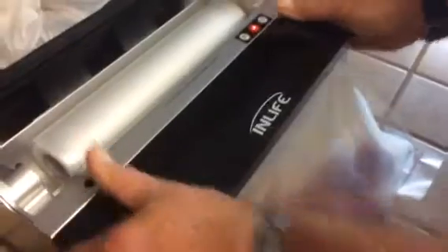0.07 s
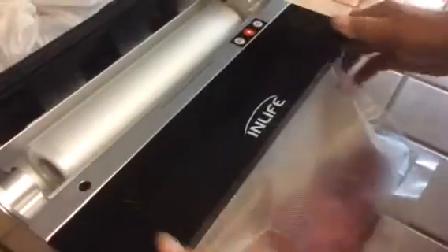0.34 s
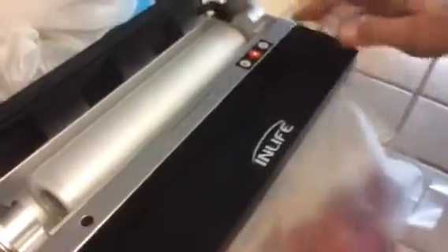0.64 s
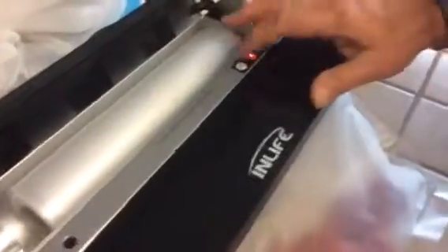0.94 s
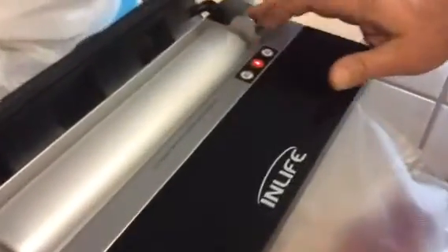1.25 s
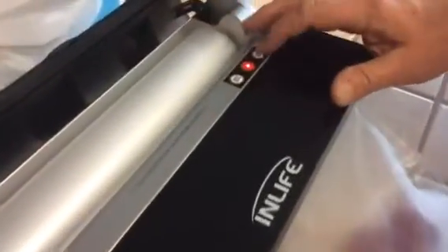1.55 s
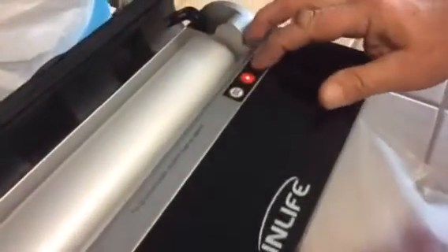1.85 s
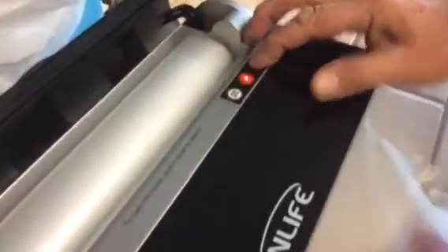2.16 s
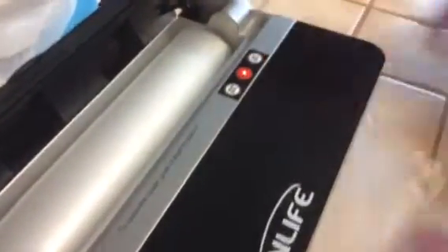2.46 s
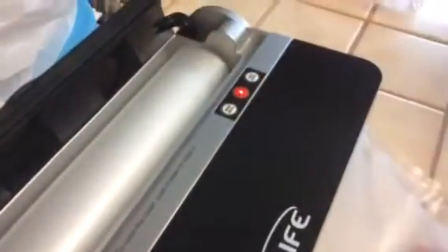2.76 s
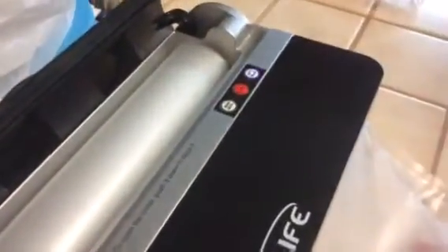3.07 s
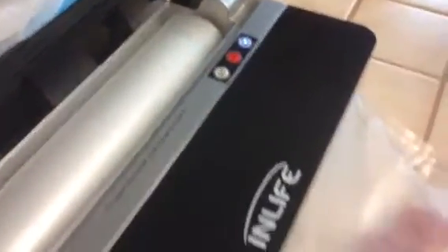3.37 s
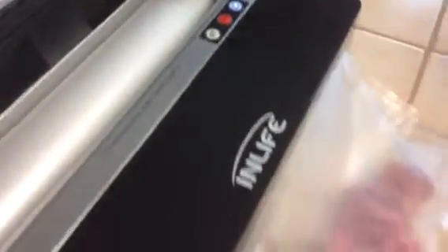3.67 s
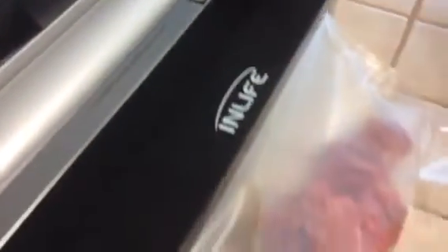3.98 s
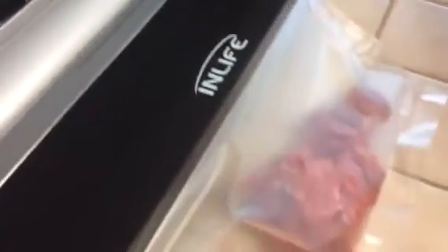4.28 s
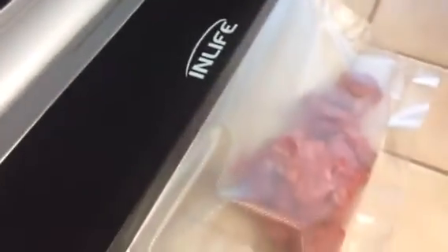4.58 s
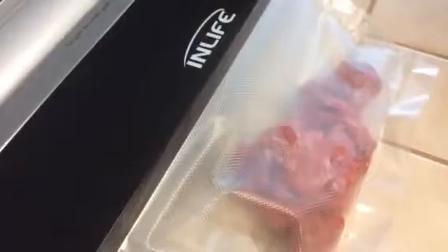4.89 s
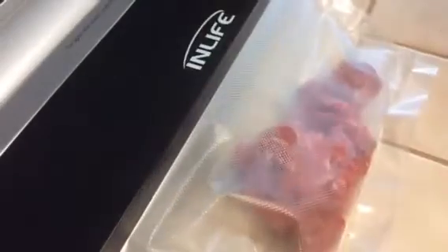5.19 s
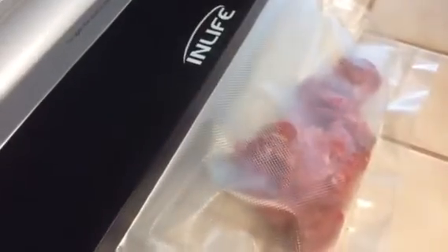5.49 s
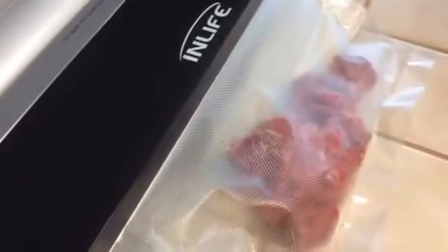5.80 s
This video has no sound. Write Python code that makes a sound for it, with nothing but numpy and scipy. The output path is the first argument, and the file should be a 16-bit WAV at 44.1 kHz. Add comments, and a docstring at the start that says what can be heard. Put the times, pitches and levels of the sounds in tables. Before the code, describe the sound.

Soft handling thumps and faint button clicks, followed by the low, even hum of a kitchen vacuum sealer's pump.

```python
"""A quiet room, with a kitchen vacuum sealer on a counter, heard from a hand-held phone.
Fingers bump and rub the phone's case (structure-borne sound) and buttons click (damped modes).
Then the piston pump starts and purrs at 41 strokes a second: periodic knocks drive its housing
in a harmonic series, and air puffs through the valves. The timbre shifts as the phone moves
from the panel to the bag, whose film ticks once."""
import sys
import numpy as np
from scipy import signal
from scipy.fft import rfft, irfft
from scipy.io import wavfile

SR = 44100
rng = np.random.default_rng(int(sys.argv[2]) if len(sys.argv) > 2 else 0)


def dump(signal):
    """Clip the signal to [-1, 1] and save it as 16-bit WAV at the path in sys.argv[1]."""
    limited = np.clip(np.atleast_2d(signal).T, -1, 1)
    pcm = np.round(limited * 32767).astype(np.int16)
    wavfile.write(sys.argv[1], SR, pcm)


N = 261954
TIME = np.arange(N) / SR


def from_db(db):
    """Amplitude ratio of a level in decibels."""
    return 10 ** (np.asarray(db) / 20)


def unit_rms(x):
    """Normalisation to an rms of 1."""
    return x / np.sqrt(np.mean(x ** 2) + 1e-20)


def over_time(rows):
    """Linear interpolation of (t/s, value) rows at every sample."""
    return np.interp(TIME, *np.transpose(rows))


def at_frequency(rows, hz):
    """Interpolation of (f/Hz, value) rows on a logarithmic frequency axis."""
    f, value = np.transpose(rows)
    return np.interp(np.log(hz + 1), np.log(f + 1), value)


def noise(spectrum):
    """Spectral shaping of white noise, scaled to an rms of 1."""
    gain = from_db(at_frequency(spectrum, np.fft.rfftfreq(N, 1 / SR)))
    return unit_rms(irfft(rfft(rng.standard_normal(N)) * gain, N))


def drift(per_second):
    """Random fluctuation of rms 1: straight lines between Gaussian values."""
    values = rng.standard_normal(4096)
    return unit_rms(np.interp(TIME * per_second, np.arange(len(values)), values))


def swell(middle_s, length_s):
    """Gaussian envelope of height 1."""
    return np.exp(-(2 * (TIME - middle_s) / length_s) ** 2)


def add(mix, start_s, sound):
    """Superposition of a sound on the mix."""
    part = mix[max(round(start_s * SR), 0):][:len(sound)]
    part += sound[:len(part)]


# Spectrum of room rumble and microphone hiss: f/Hz, relative level/dB
FLOOR_SPECTRUM = [(15, 17), (45, 25.5), (100, 13.5), (200, 9), (400, 5), (800, 1), (1600, -2), (3200, -4),
                  (6800, -4.5), (7900, -4.5), (9500, -8), (12000, -14), (14300, -18.5)]

def background(floor_db=-74, whine_hz=9001, whine_db=-97):
    """Stationary noise floor: broadband rumble and hiss, with a pure tone of electronic whine."""
    whine = np.sqrt(2) * np.sin(2 * np.pi * whine_hz * TIME)
    return from_db(floor_db) * noise(FLOOR_SPECTRUM) + from_db(whine_db) * whine


# Plastic clicks, buttons first, then the bag: t/s, initial level/dB, f/Hz, 60 dB decay time/s
PLASTIC_MODES = [(1.912, -64.5, 570, 0.025), (2.283, -60.5, 595, 0.031), (2.856, -61, 640, 0.016),
                 (5.388, -54.5, 5200, 0.0031), (5.3887, -63, 8300, .003)]

def plastic_clicks():
    """Free damped vibration: each click rings one mode of the plastic, which decays exponentially."""
    out, t = np.zeros(N), np.arange(4096) / SR
    for start_s, db, hz, t60 in PLASTIC_MODES:
        decay = np.exp(-np.log(1000) * t / t60)
        add(out, start_s, from_db(db) * decay * np.sin(2 * np.pi * hz * t))
    return out


# Spectrum of skin rubbing on the case: f/Hz, relative level/dB
RUB_SPECTRUM = [(15, -14.5), (35, 6), (65, 5.5), (105, -4.5), (160, -11), (250, -20), (400, -35.5),
                (700, -52), (1500, -62)]
# Spectrum of a sliding fingertip: f/Hz, relative level/dB
SLIDE_SPECTRUM = [(40, -24), (110, 4.5), (190, -1.5), (290, -4), (420, -20), (650, -25), (1200, -57),
                  (3000, -70)]
# Shifts of grip: middle t/s, rub duration/s, relative rub level/dB, slide level/dB
GRIP_SHIFTS = [(0.064, 0.14, -57, -86), (0.596, 0.25, -54.5, -79), (1.046, 0.078, -57.5, -74),
               (1.348, .36, -52.5, -59), (2.012, 0.04, -58.5, -87), (2.257, .14, -58.5, -65),
               (2.622, 0.17, -65, -89), (3.188, 0.15, -52, -77), (3.416, 0.17, -57, -76),
               (3.782, .2, -61.5, -67.5), (4.318, 0.032, -46, -70), (4.624, 0.044, -57, -68),
               (4.75, 0.041, -58, -81), (4.89, 0.058, -54.5, -60.5), (5.72, 0.08, -55.5, -64)]

def grip_friction(hold_db=-69.5, waver_db=2.5, rub_gain_db=-1, slide_s=0.053, lead_s=0.006):
    """Friction noise: the hand always rubs faintly; each shift adds a low swell and a brighter slide."""
    hold = from_db(hold_db + waver_db * drift(per_second=9))
    rubs, slides = np.zeros(N), np.zeros(N)
    for middle_s, length_s, rub_db, slide_db in GRIP_SHIFTS:
        rubs += from_db(rub_db + rub_gain_db) * swell(middle_s, length_s)
        slides += from_db(slide_db) * swell(middle_s - lead_s, slide_s)  # fingertip leads the palm
    rubbing = np.hypot(hold, rubs) * noise(RUB_SPECTRUM)  # incoherent sources add in power
    return rubbing + slides * noise(SLIDE_SPECTRUM)


# Finger bumps on the phone's case: t/s, peak level/dB, softness as the push's time constant/s
FINGER_BUMPS = [(.545, -43.5, 0.0014), (.566, -44.5, 0.0019), (.627, -45, 0.0024), (.668, -29, 0.0027),
                (.986, -43, 0.0034), (1.249, -27.5, 0.0022), (1.275, -36, .0019), (1.316, -37, .0021),
                (1.344, -35.5, 0.0023), (1.36, -36, 0.0038), (1.408, -32.5, 0.0011), (1.418, -36.5, 0.0049),
                (1.447, -37, 0.0024), (1.509, -29, 0.0026), (1.522, -32, 0.0026), (1.571, -34, .0016),
                (1.695, -42, 0.0017), (2.233, -38.5, 0.0022), (2.279, -44.5, .0028), (3.154, -28.5, .0026),
                (3.181, -36, 0.0028), (3.2, -38.5, 0.0016), (3.215, -32, 0.0024), (3.28, -35, .002),
                (3.363, -29.5, .0018), (3.394, -32, 0.0018), (3.98, -43.5, .0034), (4.312, -26.5, 0.00094),
                (4.733, -47.5, 0.0018), (4.907, -48.5, 0.00059), (5.511, -34.5, 0.0014),
                (5.522, -37, 0.0031), (5.542, -27.5, 0.0022), (5.573, -27.5, 0.0022),
                (5.582, -36.5, 0.0032)]

def finger_bumps(typical_softness_s=0.0022, typical_db=-36, rebound_hz=66.7, cushion_hz=650):
    """Soft impact: a cushioned push loses its slow part, leaving one swing between two rebounds."""
    out, t = np.zeros(N), np.arange(-3000, 3000) / SR
    for peak_s, db, softness_s in FINGER_BUMPS:
        sharpness, strength = typical_softness_s / softness_s, from_db(db - typical_db)
        # sharper and stronger pushes rebound faster
        low_cut_hz = rebound_hz * sharpness ** 0.29 * strength ** 0.11
        low_cut = signal.butter(2, low_cut_hz, "high", fs=SR, output="sos")
        cushion = signal.butter(2, cushion_hz * sharpness, "low", fs=SR, output="sos")
        push = (1 + abs(t) / softness_s) * np.exp(-abs(t) / softness_s)
        swing = signal.sosfiltfilt(cushion, signal.sosfiltfilt(low_cut, push))
        add(out, peak_s + t[0], from_db(db) * swing / abs(swing).max())
    return out


def minimum_phase(db):
    """Causality: a minimum-phase resonator's phase is minus the Hilbert transform of its log gain."""
    log_gain = np.log(from_db(db))
    mirrored = np.concatenate([log_gain, log_gain[::-1]])
    return -signal.hilbert(mirrored).imag[:len(db)]


# Path of the phone: t/s, position (0 over the panel, 1 over the bag)
PHONE_PATH = [(2.85, 0.64), (3.3, 0), (3.6, 0.3), (3.85, 0.15), (4.2, 0.98), (5.94, 1)]
# Housing harmonics from the second upwards: relative level/dB over the panel, and over the bag
HOUSING_HARMONICS = [(-91, -92), (-79, -80), (-81, -84), (-75, -77), (-80, -81), (-77, -78), (-76.5, -77.5),
                     (-83, -87), (-86, -87), (-95, -106), (-86, -92), (-89, -85), (-79, -81), (-108, -100),
                     (-77, -83), (-94, -89), (-89, -87), (-93, -90), (-92, -97), (-92, -82.5), (-84, -83.5),
                     (-86, -94), (-97, -91), (-95, -98), (-95, -103), (-99, -92), (-97, -99), (-89, -91),
                     (-95, -99), (-89, -89), (-90, -88), (-96, -99), (-104, -98), (-113, -110),
                     (-100, -107), (-116, -115), (-99, -105), (-101, -100), (-96, -104), (-109, -113),
                     (-93, -104)]
# Group delay of the housing, which answers each stroke treble first: f/Hz, delay/s
HOUSING_DELAY = [(40, 0.0127), (300, 0.01299), (600, .011), (900, 0.0029), (1250, 0.0017), (1800, 0.0009)]

def housing_hum(strokes, stroke_hz, buzz_db=(-107, -112), scatter_rad=1.0, waver_db=1.03):
    """Forced vibration: periodic piston knocks make the housing radiate harmonics of the stroke rate."""
    # a faint, even buzz reaches an octave above the strong harmonics
    levels = list(HOUSING_HARMONICS) + [buzz_db] * len(HOUSING_HARMONICS)
    orders = 2 + np.arange(len(levels))
    # dispersion spreads each knock over the stroke; reflections from the counter scatter it further
    lag_cycles = np.cumsum(at_frequency(HOUSING_DELAY, orders * stroke_hz)) * stroke_hz
    phases = minimum_phase(np.mean(levels, axis=1)) - 2 * np.pi * lag_cycles
    phases += scatter_rad * rng.standard_normal(len(levels))
    hum, position = np.zeros(N), over_time(PHONE_PATH)
    for order, (panel_db, bag_db), phase in zip(orders, levels, phases):
        amplitude = (1 - position) * from_db(panel_db) + position * from_db(bag_db)
        waver = from_db(waver_db * drift(per_second=8.7))
        hum += amplitude * waver * np.cos(2 * np.pi * order * strokes + phase)
    return np.sqrt(2) * hum


# Spectrum of air puffing through the valves: f/Hz, relative level/dB
VALVE_SPECTRUM = [(40, -13.5), (150, 8), (350, -4), (600, -10.5), (1000, -13.5), (1400, -18), (2500, -24),
                  (4000, -24), (9000, -76)]

def valve_air(strokes, depth=0.3):
    """Amplitude modulation: flow noise of rms 1 swells into one puff per stroke."""
    return unit_rms(noise(VALVE_SPECTRUM) * (1 + depth * np.cos(2 * np.pi * strokes)))


def pump_envelope(start_s=2.85, spin_up_s=0.015, catch_s=0.009, settle_s=1.1,
                  spin_up_db=-7, working_db=1, settled_db=-1.2):
    """Starting transient: a quiet spin-up, the piston catches, the gain settles as the bag empties."""
    age = TIME - start_s
    caught = np.clip((age - spin_up_s) / catch_s, 0, 1)
    running_db = settled_db + (working_db - settled_db) * np.exp(-np.maximum(age, 0) / settle_s)
    return (age > 0) * from_db((1 - caught) * spin_up_db + caught * running_db)


# Stroke rate of the piston: t/s, f/Hz
STROKE_RATE = [(2.85, 40.7), (2.95, 41.22), (3.15, 41.32), (3.5, 41.2), (4.2, 41.16), (5.4, 41.14),
               (5.94, 41.09)]

def piston_pump(air_db=-76, jitter_strokes=0.001):
    """Periodic excitation: each piston stroke knocks the housing and lets out a puff of air."""
    strokes = np.cumsum(over_time(STROKE_RATE)) / SR + jitter_strokes * drift(per_second=40)
    hum = housing_hum(strokes, stroke_hz=STROKE_RATE[-1][1])
    return pump_envelope() * (hum + from_db(air_db) * valve_air(strokes))


def scene():
    """Linear superposition: the sealer, the handling sounds and the room at one microphone."""
    return (piston_pump() + finger_bumps() + grip_friction() + plastic_clicks() + background())[None]


def record(dry):
    """Band limiting: the phone acts as a linear-phase low-pass filter."""
    cutoff_hz = 14600
    low_pass = signal.firwin(511, cutoff_hz, window=("kaiser", 9), fs=SR)
    return signal.oaconvolve(dry, low_pass[None], "same")


dry = scene()
out = record(dry)
dump(out)
```